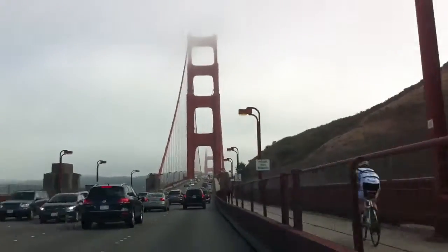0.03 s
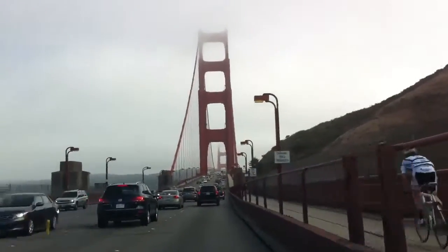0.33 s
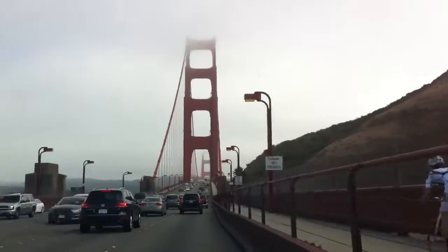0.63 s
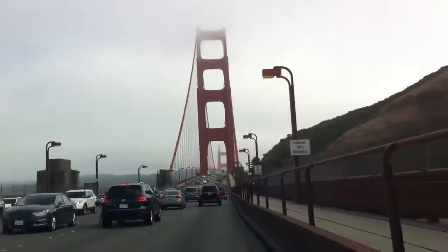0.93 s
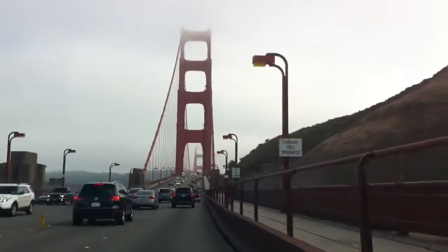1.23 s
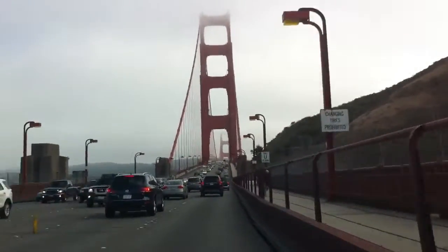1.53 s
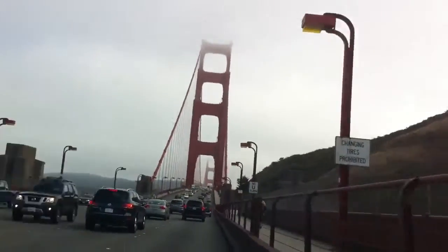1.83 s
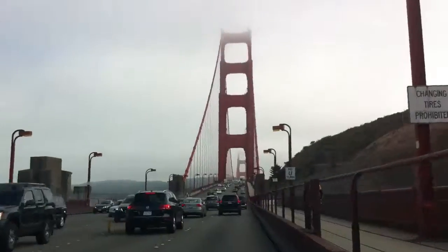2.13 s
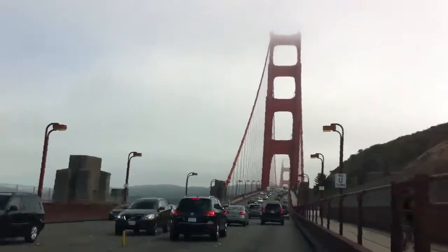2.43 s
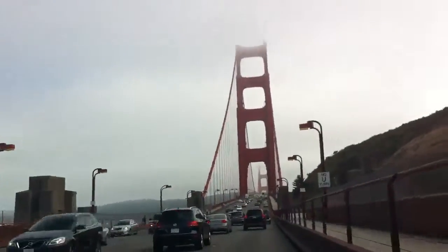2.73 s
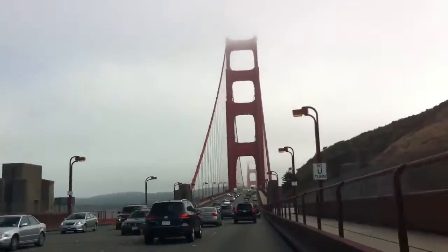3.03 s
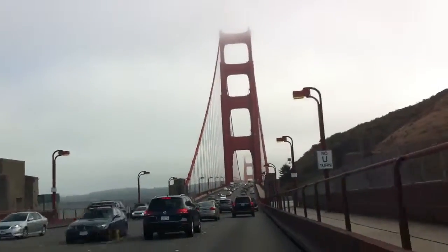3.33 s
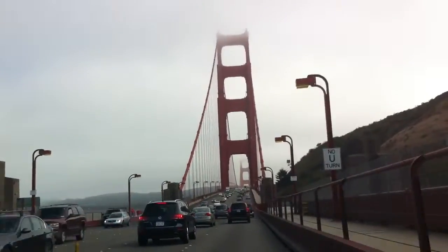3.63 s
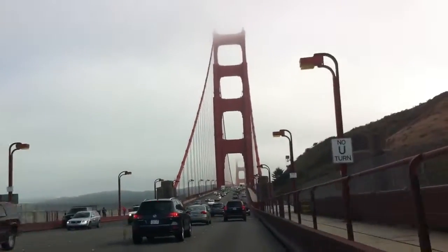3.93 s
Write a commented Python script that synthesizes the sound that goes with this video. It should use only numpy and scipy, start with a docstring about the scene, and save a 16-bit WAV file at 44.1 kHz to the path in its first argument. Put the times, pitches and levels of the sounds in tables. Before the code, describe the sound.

A car's cabin rumbles with road and tyre noise, under handling rubs and one sharp click.

```python
"""Inside a car rolling over a bridge in traffic. From the start the road booms in the cabin, tyres roar
and air hisses over a faint engine. Fingers rub, tap and knock on the hand-held recorder as the wheels
cross a bump and an oncoming car swishes by. Near the middle a fingertip squeaks, then one sharp click
makes the gain control duck, and the rumble swells back. More bumps and a second car follow, and the
engine drones up near the end."""
import sys
import numpy as np
from scipy import signal
from scipy.fft import rfft, irfft
from scipy.io import wavfile
from scipy.ndimage import uniform_filter1d

SR = 44100
rng = np.random.default_rng(int(sys.argv[2]) if len(sys.argv) > 2 else 0)


def store_pcm(level_fs):
    """Save levels as 16-bit WAV."""
    pcm = np.round(np.clip(level_fs, -1, 1) * 32767).astype(np.int16)
    wavfile.write(sys.argv[1], SR, np.atleast_2d(pcm).T)


N = 176400
T = np.arange(N) / SR


def from_db(db):
    """Decibels to gain."""
    return 10 ** (np.asarray(db) / 20)


def unit_rms(x):
    """Scale to an rms of 1."""
    return x / np.sqrt(np.mean(x ** 2) + 1e-20)


def fader(curve):
    """A gain ride through (t/s, level/dB) points."""
    return from_db(np.interp(T, *np.transpose(curve)))


def swell(peak_s, rise_s, fall_s, steepness=1.24):
    """An envelope that rises to 1 and falls away, each side with its own time constant."""
    distance = np.abs((T - peak_s) / np.where(T < peak_s, rise_s, fall_s))
    return np.exp(-np.minimum(distance ** steepness, 20))


def drift(rate_hz):
    """Random modulation of rms 1, rolling off above the rate."""
    f = np.fft.rfftfreq(N, 1 / SR)
    return unit_rms(irfft(rfft(rng.standard_normal(N)) / (1 + (f / rate_hz) ** 2), N))


def noise(eq, resonances=()):
    """White noise shaped by an EQ curve and resonant peaks, at an rms of 1."""
    f = np.fft.rfftfreq(N, 1 / SR) + 1e-3
    eq_hz, eq_db = np.transpose(eq)
    db = np.interp(np.log(f), np.log(eq_hz), eq_db)
    db -= 20 * np.maximum(np.log2(f / eq_hz[-1]), 0)   # 20 dB per octave off the top
    for hz, width_hz, boost_db in resonances:
        db += boost_db / (1 + (2 * (f - hz) / width_hz) ** 2)
    return unit_rms(irfft(rfft(rng.standard_normal(N)) * from_db(db), N))


def steadied(x, span_s):
    """Even out the chance swells that last longer than the span."""
    return x / np.sqrt(uniform_filter1d(x ** 2, max(int(span_s * SR), 2)) + 1e-12)


def ring(x, hz, t60):
    """A resonator: a unit click sets a sine of height 1 ringing."""
    decay, step = from_db(-60 / (t60 * SR)), 2 * np.pi * hz / SR
    return signal.lfilter([0, np.sin(step)], [1, -2 * decay * np.cos(step), decay ** 2], x + 1e-18)


def ring_modes(x, modes):
    """Ring a bank of (f/Hz, level/dB, t60/s) modes, neighbours in opposite polarity."""
    return sum(-(-1) ** k * from_db(db) * ring(x, hz, t60) for k, (hz, db, t60) in enumerate(modes))


RUMBLE_FADER = [(0, -32.5), (.25, -35), (.48, -34.5), (.6, -37.5), (.85, -36), (1.0, -34.5), (1.3, -34),
                (1.6, -37.5), (1.68, -27.5), (1.78, -35), (1.95, -33), (2.15, -34.5), (2.6, -34.5),
                (2.79, -34.5), (3.1, -37.5), (3.45, -37), (3.72, -38.5), (3.88, -34.5), (4, -37)]   # low road bed: t/s, level/dB
RUMBLE_EQ = [(20, -51), (40, -39), (62, -23), (85, -17), (120, -6), (160, -3.5), (215, -4), (280, -4.5),
             (350, -14), (500, -23), (900, -21.5)]   # its dark tone: f/Hz, level/dB
CABIN_BOOMS = [(151, 65, 2), (249.2, 21, 8.5)]   # low cabin resonances: f/Hz, width/Hz, boost/dB
def road_rumble():
    """The road booms through the cabin's low resonances."""
    return fader(RUMBLE_FADER) * steadied(noise(RUMBLE_EQ, CABIN_BOOMS), span_s=0.092)


TYRE_FADER = [(0, -38.5), (.2, -37.5), (.37, -36.5), (.55, -38), (1.0, -37.5), (1.5, -38.5), (2.1, -39.5),
              (2.3, -37), (2.7, -42.5), (2.97, -41.5), (3.3, -41.5), (3.6, -41.5), (4, -46)]   # tyre roar: t/s, level/dB
TYRE_EQ = [(150, -25), (300, -1), (420, -3), (700, -4), (830, -1), (910, -9.5), (1050, -1.5), (1300, -12),
           (1600, -14), (2000, -17.5), (3000, -23), (4000, -32.5), (8000, -50)]   # its midrange body: f/Hz, level/dB
CABIN_MIDS = [(417.5, 34, 7.5), (556, 76, 7.5), (676, 87, 5.5), (974, 35, 6.5), (1486, 96, 7.5)]   # higher cabin resonances: f/Hz, width/Hz, boost/dB
TREAD_FADER = [(0, -48), (.6, -49), (1.0, -42), (2.1, -42.5), (2.4, -45), (3.0, -56.5), (4, -54)]   # singing tread: t/s, level/dB
TREAD_EQ = [(470, -36), (535, -15), (560, -5.5), (588, -16.5), (660, -32), (900, -63)]   # its narrow band: f/Hz, level/dB
def tyres():
    """The tyres of this car and those around it roar through the cabin, and the tread sings."""
    roar = fader(TYRE_FADER) * noise(TYRE_EQ, CABIN_MIDS)
    tread = fader(TREAD_FADER) * steadied(noise(TREAD_EQ), span_s=0.205)
    return roar + tread


AIR_FADER = [(0, -51), (.5, -54), (1.1, -53.5), (1.6, -54.5), (2.2, -51), (2.7, -55), (3.1, -55),
             (3.6, -59.5), (4, -62)]   # airflow: t/s, level/dB
AIR_EQ = [(1000, 9.5), (2500, 3.5), (3800, 2), (5300, 3.5), (6600, 1.5), (7800, -8.5), (9500, -5),
          (12500, -5.5), (14500, -9.5), (16000, -13)]   # its wide hiss: f/Hz, level/dB
def air_rush():
    """Air hisses as it rushes past the car's body."""
    return fader(AIR_FADER) * noise(AIR_EQ)


ENGINE_FADER = [(0, -43.5), (.8, -58), (1.0, -40), (1.3, -49.5), (3.2, -52), (3.38, -45), (3.49, -32),
                (3.6, -43), (3.75, -51.5), (3.86, -35.5), (3.93, -34.5), (4, -29.5)]   # engine drone: t/s, level/dB
def engine(pitch_hz=175, wander_hz=6, waver_db=3):
    """One engine order booms in the cabin, wavering in pitch and level."""
    hz = pitch_hz + wander_hz * drift(rate_hz=8.0)
    tone = unit_rms(np.sin(2 * np.pi * np.cumsum(hz) / SR))
    waver = from_db(waver_db * drift(rate_hz=7.9))
    return fader(ENGINE_FADER) * waver * tone


FINGER_SLIDES = [(.037, 0.028, 0.024, -44, -36.5), (0.093, 0.026, 0.039, -46.5, -36.5),
                 (0.1744, 0.0011, 0.0017, -48, -28), (.187, 0.01, 0.0054, -50, -47),
                 (.3845, 0.00077, 0.002, -69, -38.5), (.385, .15, 0.15, -59, -45.5),
                 (.587, .012, 0.023, -75, -43.5), (1.026, 0.0046, 0.0088, -53.5, -47),
                 (1.066, .004, 0.011, -58, -58), (1.688, 0.0068, 0.0021, -40, -37),
                 (1.702, 0.0013, 0.0059, -36, -41), (1.784, 0.0018, 0.0067, -43, -40),
                 (1.83, 0.046, .06, -50, -60), (1.886, 0.0042, 0.0036, -43, -42),
                 (1.941, 0.0017, 0.0019, -39.5, -51), (1.959, 0.019, 0.011, -43.5, -48),
                 (2.005, .03, 0.095, -48, -49.5), (2.139, .002, 0.0036, -40, -37),
                 (2.505, 0.12, 0.039, -43.5, -66), (2.53, 0.0093, 0.018, -53, -42.5),
                 (2.605, 0.027, 0.032, -51.5, -43), (2.71, .003, .004, -47.5, -39.5),
                 (2.736, .002, 0.038, -54.5, -58), (3.105, .002, 0.0044, -53, -52),
                 (3.535, 0.032, .11, -62, -55), (3.849, .001, 0.0055, -54, -47),
                 (3.89, 0.0039, .004, -57, -60)]   # slides on the casing: peak t/s, rise/s, fall/s, hiss/dB, rasp/dB
HISS_EQ = [(1500, -7), (3000, 1.5), (6500, 2), (8000, 0), (10500, 3), (12800, 3.5), (14200, -0.5),
           (16000, -10)]   # bright layer of a slide: f/Hz, level/dB
RASP_EQ = [(400, -3), (900, 11.5), (1700, 6.5), (2800, -1), (4500, -4.5), (8000, -14.5)]   # midrange layer of a slide: f/Hz, level/dB
def finger_rubs(grain_db=2.5, grain_hz=500):
    """Fingers slide on the casing in grainy swells of hiss and rasp; the shortest are crisp ticks."""
    hiss, rasp = noise(HISS_EQ), noise(RASP_EQ)
    slides = np.zeros(N)
    for peak_s, rise_s, fall_s, hiss_db, rasp_db in FINGER_SLIDES:
        slides += swell(peak_s, rise_s, fall_s) * (from_db(hiss_db) * hiss + from_db(rasp_db) * rasp)
    grain = unit_rms(from_db(grain_db * drift(grain_hz)))
    return slides * grain


FINGER_TAPS = [(0.1731, -12, 2000), (.3843, -16, 1600), (.5815, -13, 700), (1.6806, -10.5, 900),
               (1.8016, -14, 6000), (2.139, -24, 12000), (2.1654, 3.5, 14000), (3.8464, -6, 950)]   # hits on the casing: t/s, level/dB, brightness/Hz
CASING_MODES = [(377, -23, 0.026), (730, -11, 0.0089), (1510, -6, 0.0048), (2440, -8.5, 0.0023),
                (3420, -24.5, 0.011), (5000, -21.5, 0.0041), (6610, -18, 0.0044), (7840, -16, 0.0035),
                (12690, -12, 0.0024)]   # the casing's ring: f/Hz, level/dB, t60/s
CASING_NOTCHES = [(4080, 470), (9100, 330)]   # where its modes cancel: f/Hz, width/Hz
def finger_taps(high_cut_hz=13900):
    """Each tap is a push, duller when the contact is soft, that briefly rings the casing."""
    force = np.zeros(N)
    for at_s, db, bright_hz in FINGER_TAPS:
        push = from_db(db) * signal.unit_impulse(N, int(at_s * SR))
        softness = np.exp(-2 * np.pi * bright_hz / SR)
        force += signal.lfilter([1 - softness], [1, -softness], push + 1e-18)
    clicks = ring_modes(force, CASING_MODES)
    for hz, width_hz in CASING_NOTCHES:
        clicks = signal.lfilter(*signal.iirnotch(hz, hz / width_hz, fs=SR), clicks)
    return signal.sosfilt(signal.butter(6, high_cut_hz, fs=SR, output="sos"), clicks)


ROAD_PATCHES = [(0.22, 0.039, -30.5), (1.684, 0.032, -32.5), (1.873, 0.069, -34), (2.784, 0.037, -29.5),
                (2.98, 0.049, -30.5), (3.49, 0.035, -36)]   # uneven patches under the wheels: peak t/s, rise and fall/s, level/dB
BUMP_EQ = [(20, -19), (50, -10), (82, 3), (130, 2.5), (240, 11.5), (350, -3.5), (560, -2), (900, -10),
           (2000, -45)]   # their low thump: f/Hz, level/dB
def road_bumps():
    """Each uneven patch shakes the car's body for a moment."""
    shake = sum(from_db(db) * swell(peak_s, ramp_s, ramp_s) for peak_s, ramp_s, db in ROAD_PATCHES)
    return shake * steadied(noise(BUMP_EQ), span_s=0.035)


PASS_BYS = [(.37, 0.18, -39.5), (3.08, 0.16, -44)]   # oncoming cars: nearest t/s, rise and fall/s, level/dB
PASS_BY_EQ = [(300, -26), (410, 7), (490, -14), (560, 6), (625, -6), (690, 11), (880, -9), (1060, -3),
              (1300, -21.5), (3000, -21), (4000, -35)]   # their swish: f/Hz, level/dB
def oncoming_cars():
    """The tyre noise of each oncoming car swells and fades as it goes by."""
    nearness = sum(from_db(db) * swell(peak_s, ramp_s, ramp_s) for peak_s, ramp_s, db in PASS_BYS)
    return nearness * noise(PASS_BY_EQ)


HAND_KNOCKS = [(.3835, -27), (1.9425, -16.5), (2.0560, -17), (3.8463, -23)]   # dull hits on the recorder: t/s, level/dB
THUD_MODES = [(174, -18.5, 0.021), (286, 4.5, 0.016), (584, -5, 0.0092), (1000, -33, 0.0092)]   # the body of each thud: f/Hz, level/dB, t60/s
def hand_knocks(low_cut_hz=103):
    """The soft hand knocks the recorder: a short, low thud with no sub weight."""
    force = np.zeros(N)
    for at_s, db in HAND_KNOCKS:
        force[int(at_s * SR)] = from_db(db)
    thuds = sum(from_db(db) * ring(force, hz, t60) for hz, db, t60 in THUD_MODES)
    return signal.sosfilt(signal.butter(2, low_cut_hz, "high", fs=SR, output="sos"), thuds)


SLIP_MODES = [(2800, -1, 0.0018), (3880, -0.5, 0.0049), (4500, -3.5, 0.0076), (5170, -1.5, 0.0034),
              (8360, -7, .004), (11700, -2.5, .0035), (12400, -7, .003)]   # high resonances of the squeak: f/Hz, level/dB, t60/s
def finger_squeak(slips_per_s=1100, spread_db=1.5, squeak_db=-40.5, snap_s=1.8013, snap_db=-23):
    """A fingertip sticks and slips on the casing in a fast, uneven run; one hard slip snaps."""
    slips = (rng.random(N) < slips_per_s / SR) * from_db(spread_db * rng.standard_normal(N))
    ringing = steadied(ring_modes(slips, SLIP_MODES), span_s=0.022)
    squeak = swell(peak_s=1.826, rise_s=0.038, fall_s=0.042) * ringing
    snap = ring_modes(signal.unit_impulse(N, int(snap_s * SR)), SLIP_MODES)
    return from_db(squeak_db) * squeak + from_db(snap_db) * snap


def scene():
    """The driving bed and the handling noise, mixed in mono at one microphone."""
    driving = road_rumble() + tyres() + air_rush() + oncoming_cars() + road_bumps() + engine()
    handling = finger_rubs() + finger_taps() + hand_knocks() + finger_squeak()
    return (driving + handling)[None]


def record(dry):
    """The gain control ducks fast on a peak and recovers slowly; a steep filter cuts the top."""
    threshold_db, attack_s, release_db_per_s, high_cut_hz = -14, 0.003, 11, 15900
    over_db = np.maximum(20 * np.log10(np.abs(dry[0]) + 1e-9) - threshold_db, 0)
    release_db = release_db_per_s * T
    held_db = np.maximum.accumulate(over_db + release_db) - release_db
    lag = np.exp(-1 / (attack_s * SR))
    duck_db = signal.lfilter([1 - lag], [1, -lag], held_db)
    high_cut = signal.ellip(12, 0.1, 80, high_cut_hz, fs=SR, output="sos")
    return signal.sosfilt(high_cut, dry * from_db(-duck_db))


dry = scene()
out = record(dry)
store_pcm(out)
```